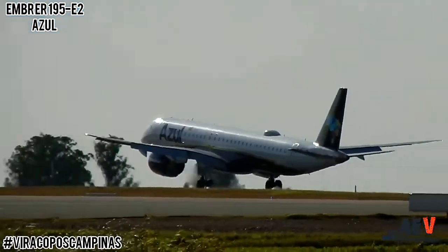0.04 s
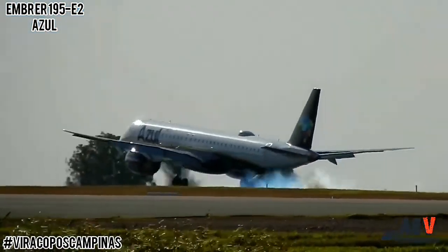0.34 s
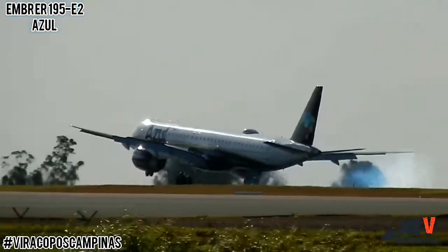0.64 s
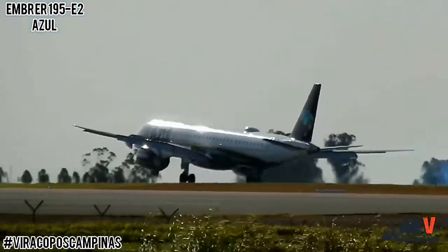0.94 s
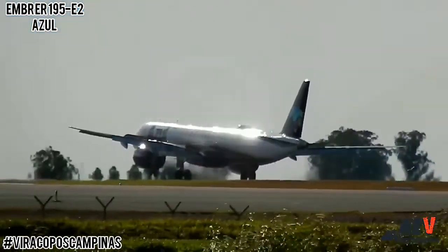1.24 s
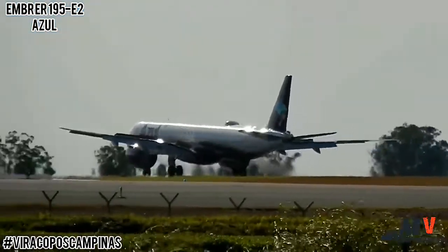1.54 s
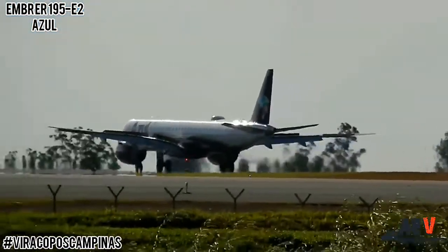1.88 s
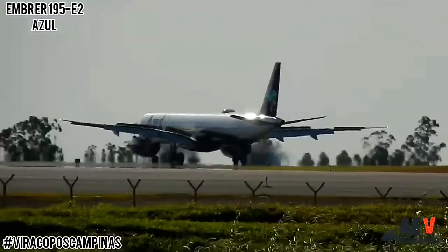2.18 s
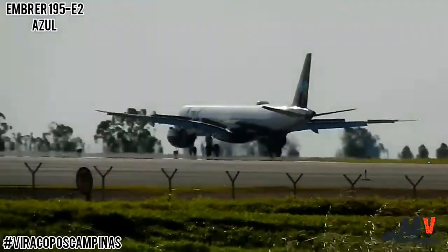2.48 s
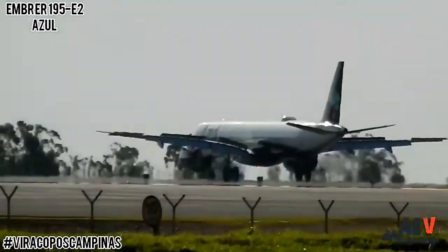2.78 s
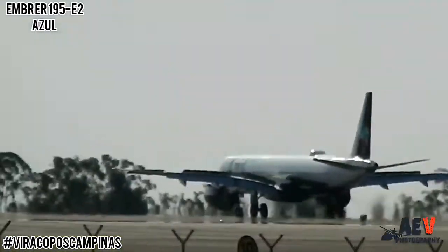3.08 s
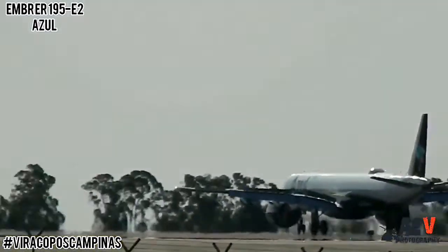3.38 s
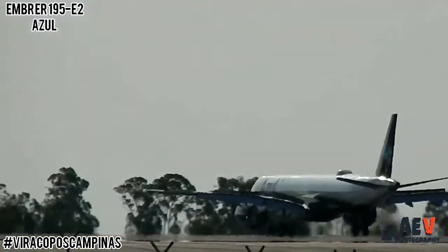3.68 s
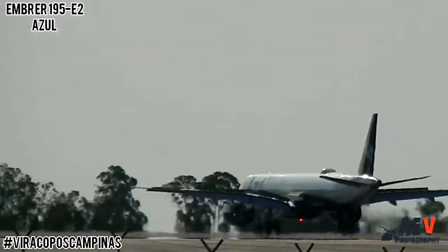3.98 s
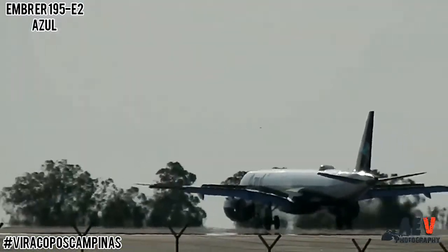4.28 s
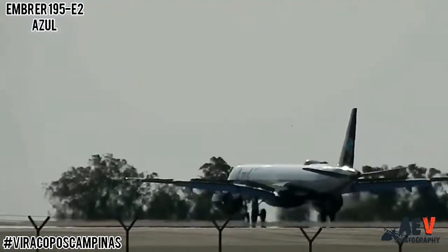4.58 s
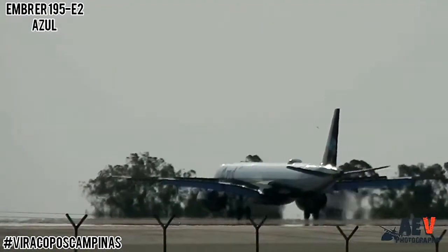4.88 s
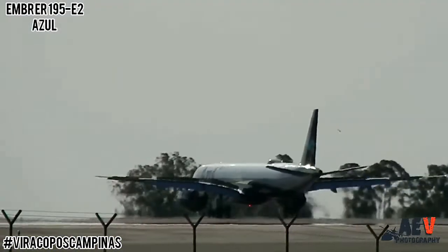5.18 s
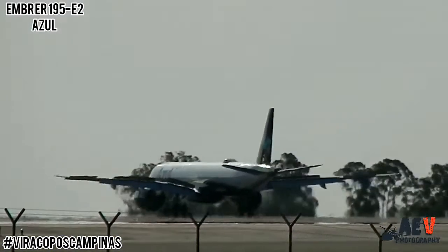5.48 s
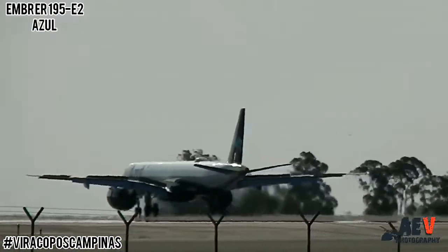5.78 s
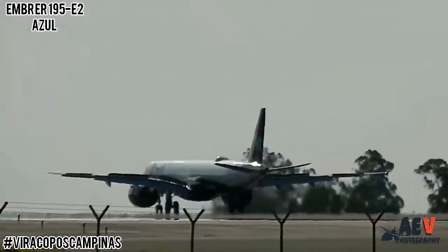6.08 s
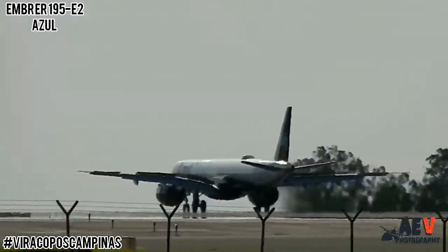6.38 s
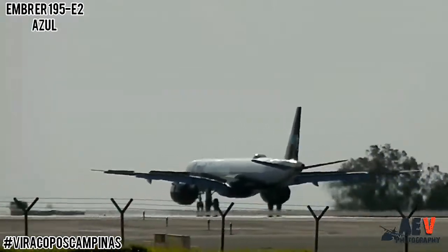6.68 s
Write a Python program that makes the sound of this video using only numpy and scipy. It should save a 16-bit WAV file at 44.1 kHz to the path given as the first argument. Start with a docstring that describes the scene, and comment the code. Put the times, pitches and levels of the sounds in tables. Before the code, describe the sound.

Gusty wind thumps on the microphone while a strap flaps in a fast, crackling rattle and a faraway airliner rumbles along a runway.

```python
"""A loose strap flutters close by in bouts of rapid snaps that harden as the wind pulls it taut.
Each whip of its free end rings, crackles and sizzles, and the strap scrapes as it drags.
Gusts buffet both microphone ports (the left and right openings) here at the airfield fence.
Behind them the jet roar of an airliner rolling far down a runway swells and fades,
and dry grass hisses and ticks."""
import sys
import numpy as np
from scipy import signal
from scipy.fft import rfft, irfft, next_fast_len
from scipy.io import wavfile
from scipy.ndimage import uniform_filter1d, map_coordinates

SR = 44100
rng = np.random.default_rng(int(sys.argv[2]) if len(sys.argv) > 2 else 0)


def wav_out(sig):
    """Save sig, one row per channel (or a flat mono array), as 16-bit PCM at SR to the path in sys.argv[1]."""
    wavfile.write(sys.argv[1], SR, np.round(np.clip(np.atleast_2d(sig).T, -1, 1) * 32767).astype(np.int16))


N = 301379
TIME = np.arange(N) / SR

# Levels in the tables are relative: each source adds its own gain.
# How fast the strap whips, one list for each bout: time_s, snap_rate_hz
FLUTTER_BOUTS = [
    [(.334, 41.4), (.55, 41.5), (.78, 42.5), (.788, 42.5)],
    [(1.165, 35.0), (1.46, 35.5), (1.75, 36.0), (2.04, 36.6), (2.34, 37.4), (2.63, 37.9), (2.92, 38.6),
     (3.21, 39.4), (3.51, 40.4), (3.8, 41.1), (4.09, 41.8), (4.38, 42.5), (4.68, 42.8)],
    [(5.089, 36.6), (5.226, 36.4), (5.5, 37.0), (5.97, 37.6)],
    [(6.117, 37.0), (6.3, 37.0)],
]
# The strap pulls taut and holds until it slips. Slack fades over pull_s, leaving the last four values:
# start_s, pull_s, slack_db, snap_db, crackle_db, sizzle_db, ring_tilt_db_per_octave
PULLS = [(.32, 0.45, 14.5, -18, -38, -53, 13.5), (1.15, 0.29, 6.5, -14, -41.5, -50, 2.5),
         (1.55, 0.31, -7, -21, -41, -46.5, -3), (1.99, 1.0, 4.5, -17, -35.5, -50, -2.5),
         (3.08, 0.11, 2.5, -22, -41, -50, -4.5), (3.35, 0.2, 9, -20.5, -39, -44, 1),
         (3.8, 0.36, 10, -15.5, -35.5, -39, 0.5), (4.2, 0.15, 2, -13, -38, -42.5, -.5),
         (5.08, 0.32, 9, -15.5, -54.5, -40, 5), (5.51, 0.11, 2, -18, -61, -45, -5),
         (5.78, 0.16, 4, -29, -61, -51.5, 2), (6.1, 0.051, -8, -33, -56, -62, -3)]
# Single whips that stand out: time_s, extra_snap_db, extra_crackle_db, extra_sizzle_db
ACCENTS = [(.719, 1.5, -4, -1), (.743, 3, -5, 5), (.767, 3, 0, 5), (1.165, 4, -5, -4), (1.193, 5.5, -5, -2),
           (1.222, -2.5, -1, -4), (1.249, 3, -2, -2), (1.307, 1.5, -4, 0), (1.335, 6, 2, 0),
           (1.364, 5.5, 8, 8), (1.392, 6, 6, 6), (1.42, -3.5, 0, -2), (1.449, -1, 12, 19),
           (1.477, 3.5, 7, 8), (1.505, 3.5, 6, 15), (1.533, 5.5, 9, 12), (1.955, 5.5, -6, -5),
           (2.224, -2, 10, 14), (2.302, -1, 6.5, 4), (2.355, 0, 7.5, -3), (2.675, -1, 5, 4),
           (2.961, 0, 7.5, 4), (3.012, 0.5, 6.5, 8), (3.04, 1, 1, -2), (3.216, 4, -1, 8),
           (3.54, -5, 1, 6.5), (3.665, 1, 5.5, 5), (3.715, 3.5, -2, 0), (3.74, 5, -5, 2),
           (3.765, 5.5, 8, 2), (3.98, 4.5, 9, 10), (4.08, 4.5, -10, 4), (4.149, 3, 0, -4),
           (4.22, 0.5, 2, -2), (4.291, -1, -8, -7), (4.315, 2.5, 0, -6), (4.41, 2.5, 6, 5),
           (4.48, 1, 8, 10), (4.527, 2.5, 0, 1), (4.573, 6.5, -5, 12), (4.62, 2.5, 0, 1),
           (4.645, -9, -12, -7), (5.365, 2, 23.5, 3), (5.85, -3, -4, 6)]
# The tones that ring after a snap: pitch_hz, level_db, time_to_fade_60_db_s
STRAP_TONES = [(246, -7.5, 0.056), (493, -9.5, 0.099), (773, -5, 0.057), (1315, -21, 0.036),
               (1516, -27, 0.21), (2043, -24, 0.057), (2240, -16, .04), (2720, -15.5, 0.031),
               (2880, -22.5, 0.035), (3030, -26, 0.034)]
# The pitch of the strap's edge sinks as it loosens: time_s, pitch_ratio
EDGE_TUNING = [(.8, 1.08), (1.15, 1.025), (3.5, 1.0), (4.6, 1.005), (5.3, .985)]
# How much later the strap is heard on the left: time_s, lag_s
PORT_LAG = [(.5, 0.000053), (2, 0.00014), (4.5, 0.00016)]
# The strap drags over its support: time_s, level_db, half_length_s
SCRAPES = [(.84, -40, 0.065), (1.1, -40, 0.04), (1.35, -28.5, 0.049), (1.54, -35, 0.051), (2.47, -35, 0.1),
           (2.85, -34.5, 0.047), (3.68, -30.5, 0.069), (4.58, -38, 0.072), (5.45, -40, 0.13),
           (6.22, -49, 0.048)]
# Bright rasps among the snaps: time_s, level_db, half_length_s
RASPS = [(0.743, -50.5, 0.031), (2.035, -54, 0.034), (2.158, -43.5, 0.021), (2.701, -43, 0.01),
         (5.19, -60, 0.048)]
# Big eddies (swirls of air) hit the ports: time_s, level_db, half_length_s, left_minus_right_db
BUFFETS = [(0.011, -15.5, 0.05, 2), (0.19, -19, 0.019, -18.0), (0.352, -17, 0.028, -20),
           (0.488, -13, 0.019, -5.5), (0.89, -15, 0.22, -20), (0.908, -22, 0.022, 18.0),
           (1.413, -15.5, 0.093, -1), (1.991, -17.5, 0.17, -4.5), (2.476, -17, 0.075, 7),
           (2.811, -16.5, 0.052, -10), (2.905, -17, 0.017, 18.0), (2.971, -27, 0.015, -18.0),
           (3.085, -34, 0.014, 18.0), (3.303, -14.5, 0.025, -7.5), (3.617, -18.5, 0.037, -6),
           (3.763, -12.5, 0.016, -14.0), (3.976, -19, 0.018, -16), (4.097, -17.5, 0.022, -12),
           (4.295, -20, 0.052, -18.0), (4.434, -19.5, 0.1, 18.0), (4.645, -17.5, 0.038, -6),
           (5.14, -13, 0.14, 8), (5.728, -15, 0.097, -1), (5.957, -11.5, 0.012, -10.0),
           (6.106, -17, 0.024, -18.0), (6.209, -19.5, 0.11, -11), (6.363, -20, 0.015, 18.0),
           (6.488, -23, 0.057, -13), (6.595, -13, 0.015, -18.0), (6.813, -13.5, 0.02, -7)]
# Gusts of smaller eddies: time_s, level_db, half_length_s, left_minus_right_db, swish_db
GUSTS = [(0.027, -20.5, 0.038, 17, -28), (0.153, -17.0, 0.035, 29, -22.0), (0.5, -14.5, 0.011, -1, -27.0),
         (0.636, -20, 0.016, 3, -45), (0.722, -16, 0.011, -1, -39), (0.908, -18, 0.015, 18.0, -28),
         (0.968, -22.5, 0.024, 1, -37), (1.055, -21, 0.014, -2, -36), (1.366, -18.5, 0.03, 14, -25.5),
         (1.562, -17, 0.013, 20, -20.5), (1.587, -20.5, 0.131, 15, -42.0), (1.79, -22.5, 0.025, 26, -22),
         (1.857, -25, 0.02, -18.0, -42.0), (1.972, -17, 0.024, 4.0, -31), (1.98, -21.5, 0.093, 18.0, -27.5),
         (2.181, -17, 0.032, 8.0, -42.0), (2.33, -19, 0.014, 16.0, -34), (2.528, -21.5, 0.076, 16, -25),
         (2.723, -16.5, 0.015, 18.0, -40), (2.825, -23, 0.016, 18.0, -38), (2.9, -17.5, 0.014, 18.0, -42.0),
         (3.068, -20, 0.023, 18.0, -45), (3.324, -16.5, 0.024, 10, -21.5), (3.438, -21, 0.02, 18.0, -21),
         (3.477, -25.5, 0.018, -18.0, -40), (3.551, -14, 0.036, 22, -25.5),
         (3.67, -23, 0.018, -18.0, -42.0), (3.695, -16.5, 0.042, 16.0, -21), (3.824, -21, 0.019, 20, -42.0),
         (3.99, -22.0, 0.014, -7, -45), (4.051, -20.5, 0.033, 6, -42.0), (4.245, -21.5, 0.016, 9, -33),
         (4.673, -23.0, 0.29, 21, -38), (4.698, -26, 0.017, -18.0, -28), (4.749, -14, 0.013, 9, -38),
         (4.932, -18.5, 0.022, 17, -39.5), (5.147, -34, 0.061, 3, -24.5), (5.34, -18, 0.016, 18.0, -42.0),
         (5.578, -20.5, 0.059, 5, -34), (5.748, -22.5, 0.013, -18.0, -44), (5.772, -19, 0.015, 10, -44),
         (5.91, -29, 0.044, -18.0, -40), (6.128, -17.5, 0.0089, 18.0, -42.0), (6.261, -23, 0.021, 16, -23),
         (6.38, -31, 0.014, 18.0, -27), (6.457, -16.0, 0.014, -4.5, -23.5), (6.57, -16.5, 0.056, 19, -23.0),
         (6.74, -22.5, 0.124, -24, -28)]
# The breeze drops for a moment: time_s, depth_db, half_length_s
LULLS = [(0.4, 4, 0.035), (2.99, 3, 0.025), (3.177, 2.5, 0.11), (4.8, 12, 0.016), (5.843, 8, 0.029),
         (6.023, 5.5, 0.049)]
# How loud the jet is: time_s, level_db
JET_LEVEL = [(0, -35.5), (.75, -30), (1.0, -30), (2, -37), (4, -35), (4.85, -29.5), (5.55, -22), (5.9, -27),
             (6.02, -32.5), (6.22, -27.5), (6.45, -42), (6.83, -35.5)]
# How loud the grass is: time_s, level_db
GRASS_LEVEL = [(0.0, -57), (0.26, -61), (0.36, -53), (0.54, -50.5), (1.07, -56), (1.53, -50.5), (1.73, -55),
               (2.3, -59), (2.75, -52.5), (3.33, -56.5), (3.9, -56.5), (4.3, -59), (4.6, -52), (4.82, -60),
               (5.59, -51), (5.93, -56.5), (6.01, -61.5), (6.18, -56), (6.33, -62), (6.76, -76)]
# Small dry ticks: start_s, level_db, left_minus_right_db, decay_s
TICKS = [(.821, -40.5, 1, .0005), (4.931, -38, 14, 0.00047), (5.173, -38, 2, 0.00056),
         (5.321, -38, -1, 0.00046), (6.550, -47, -17, .0006), (6.611, -47, -9, 0.00091),
         (6.670, -44.5, 23, 0.0012), (6.791, -41.5, -12, 0.00066)]

# A colour says how strong a sound is from bass to treble. Each one lists: pitch_hz, level_db
SNAP_COLOUR = [(150, -2), (400, -1.5), (800, 4), (1400, 5.5), (2100, 1), (2480, -12), (3300, -8),
               (4200, -22.5), (5100, -37), (6200, -77), (14000, -58)]
CRACKLE_COLOUR = [(1500, 10), (3000, 11), (4200, 8), (5300, 11), (6500, 2), (9000, 5.5), (11000, 6),
                  (13000, -3.5), (15500, -29)]
SIZZLE_COLOUR = [(2300, -23), (2500, -15), (2700, 13), (2900, -2), (3200, -10), (3700, -9), (4600, -14),
                 (5020, 6), (5300, -4.5), (5700, -22), (6800, -31)]
SCRAPE_COLOUR = [(300, -8), (800, 6), (1150, -7), (1450, 3.5), (1800, -7), (2100, -1), (2470, -18),
                 (2750, -4), (3200, -19), (4200, -16), (5100, -16), (6200, -31.5), (11000, -34),
                 (15000, -41)]
BUFFET_COLOUR = [(12, -13), (25, -14), (40, -6), (65, -0.5), (120, 0.5), (170, -5.5), (240, -12),
                 (400, -41), (900, -81.5)]
GUST_COLOUR = [(90, -29), (160, 0), (230, -0.5), (330, -4), (500, -11.5), (750, -22.5), (1200, -45),
               (2000, -41), (3500, -64), (7000, -73), (15000, -95)]
SWISH_COLOUR = [(200, -10), (380, 7), (550, 4.5), (850, -2.5), (1400, -14), (2500, -35.5), (4500, -47),
                (9000, -79), (15000, -64)]
JET_COLOUR = [(60, 12.5), (300, 0.5), (550, 5.5), (700, 5), (950, 10.5), (1400, -1), (2000, -8),
              (2600, -22.5), (4000, -31), (7000, -54), (15000, -61)]
GRASS_COLOUR = [(800, 2), (2000, 18.5), (3200, 15), (4500, 8.5), (6500, 6), (9000, 5), (11000, 5),
                (13000, 0), (15500, -40)]
TICK_COLOUR = [(800, 5), (2500, 10), (4500, -0.5), (6500, -2.5), (11000, -5.5), (15000, -15)]
SCUFF_COLOUR = [(2500, -37), (3800, -3), (4500, 5), (5600, -7), (7000, -12), (14000, -26)]


def strap(snap_gain_db, sizzle_gain_db):
    """Each whip makes a dip in air pressure that snaps, rings and rustles, while the edge crackles."""
    snap_db, crackle_db, sizzle_db, tilt_db = tension()
    extra_snap_db, extra_crackle_db, extra_sizzle_db = accents()
    pulses = whips(scatter_db=1.1, jitter_s=.00004)
    blows = -pulses * undb(snap_db + extra_snap_db + snap_gain_db)
    snaps = snap(blows + rattle(blows, rate_hz=400, gain_db=-20))
    rings = ringing(blows, tilt_db, gain_db=-5)
    rustle = bursts(np.abs(blows), rise_s=.00092, decay_s=.0098) * noise(SNAP_COLOUR) * undb(-30)
    crackles = crackle(pulses * undb(crackle_db + extra_crackle_db))
    sizzles = sizzle(pulses * undb(sizzle_db + extra_sizzle_db + sizzle_gain_db))
    return (at_ports(snaps + rings) + rustle + crackles + sizzles) * pan(.66)


def tension(stall_s=.03, stall_db=18):
    """A slack strap is quieter and duller than a taut one; it goes slack as each bout ends."""
    pulls = np.array(PULLS)
    current = np.maximum(np.searchsorted(pulls[:, 0], TIME) - 1, 0)
    start_s, pull_s, slack_db, snap_db, crackle_db, sizzle_db, tilt_db = pulls[current].T
    slack = slack_db * np.clip(1 - (TIME - start_s) / pull_s, 0, 1)
    for bout in FLUTTER_BOUTS:
        slack += stall_db * np.clip(1 - np.abs(TIME - bout[-1][0]) / stall_s, 0, 1) ** 2
    return snap_db - slack, crackle_db - .94 * slack, sizzle_db - slack, tilt_db - .85 * slack


def accents(reach_s=.012):
    """Some whips snap, crackle or sizzle harder or softer than their neighbours."""
    extra_db = np.zeros((3, N))
    for time_s, snap_db, crackle_db, sizzle_db in ACCENTS:
        extra_db[:, np.abs(TIME - time_s) < reach_s] = [[snap_db], [crackle_db], [sizzle_db]]
    return extra_db


def whips(scatter_db, jitter_s):
    """One pulse for each whip of the strap's free end, slightly uneven in strength and time."""
    starts = []
    for bout in FLUTTER_BOUTS:
        blowing = (TIME >= bout[0][0]) & (TIME < bout[-1][0])
        whip_count = np.ceil(np.cumsum(curve(bout) * blowing) / SR)
        starts.extend(np.flatnonzero(np.diff(whip_count, prepend=0)))
    late, strength = rng.standard_normal((len(starts), 2)).T
    pulses = np.zeros(N)
    pulses[(starts + late * jitter_s * SR).astype(int)] = undb(scatter_db * strength)
    return pulses


def snap(blows, split_hz=1500, echo_s=.001383, echo_share=.37):
    """The strap lies differently for each snap, dull or bright; a hard surface beside it echoes."""
    plain = tint(blows, SNAP_COLOUR)[0]
    lows = signal.sosfilt(signal.butter(1, split_hz, fs=SR, output="sos"), plain)
    bright_db = .8 * wander(40)[0]
    varied = lows * undb(-bright_db) + (plain - lows) * undb(bright_db)
    share = np.clip(echo_share + .06 * wander(30)[0], 0, .8)
    return sum(share ** bounce * delay(varied, bounce * echo_s) for bounce in range(3))


def rattle(blows, rate_hz, gain_db):
    """The loose end chatters in weak, irregular taps around each whip."""
    taps = (rng.random(N) < rate_hz / SR) * rng.standard_normal(N)
    return taps * undb(gain_db) * bursts(np.abs(blows), rise_s=.0046, decay_s=.016)


def ringing(blows, tilt_db, gain_db, uneven_db=1.8, detune=.007, edge_from_hz=1800, size=3000):
    """Each whip sets off fading tones, tuned and balanced a little differently as the strap shifts."""
    pitch_hz, level_db, fade_s = np.transpose(STRAP_TONES)
    age_s = np.arange(size) / SR
    decays = np.exp(-np.log(1000) * age_s / fade_s[:, None])
    decays /= np.sqrt(np.sum(decays ** 2, axis=1, keepdims=True) / 2)  # same energy for every tone
    rings, edge_ratio = np.zeros(N + size), curve(EDGE_TUNING)
    for i in np.flatnonzero(blows):
        tuning, balance = rng.standard_normal((2, len(pitch_hz)))
        weights = undb(level_db + tilt_db[i] * np.log2(pitch_hz / 1400) + uneven_db * balance)
        tuned_hz = pitch_hz * np.where(pitch_hz > edge_from_hz, edge_ratio[i], 1) * (1 + detune * tuning)
        waves = np.sin(2 * np.pi * np.outer(tuned_hz, age_s))
        rings[i:i + size] += blows[i] * weights @ (decays * waves)
    return rings[:N] * undb(gain_db)


def crackle(pulses, tip_db=19, edge_db=-5, uneven_db=1.5, grain_db=3):
    """The strap's tip gives one sharp click in each whip, and its edge crackles around it."""
    flicks = pulses * undb(uneven_db * wander(30)[0])
    click = tint(flicks, CRACKLE_COLOUR)[0] * undb(tip_db)
    envelope = bursts(flicks, rise_s=.0017, decay_s=.0047) * undb(edge_db + grain_db * wander(2500))
    hiss = noise(CRACKLE_COLOUR, channels=1) + .62 * noise(CRACKLE_COLOUR)
    return at_ports(click) + envelope * hiss


def sizzle(pulses, uneven_db=1.5):
    """The edge sizzles at each whip, and its pitch sinks as it loosens."""
    envelope = bursts(pulses * undb(uneven_db * wander(15)[0]), rise_s=.00054, decay_s=.0074)
    position = np.cumsum(curve(EDGE_TUNING))  # reading the noise more slowly lowers its pitch
    hiss = [map_coordinates(side, [position], mode="mirror") for side in noise(SIZZLE_COLOUR)]
    return envelope * np.array(hiss)


def scrapes(gain_db, catch_db):
    """The dragging strap catches and slips in fine grains that make it ring."""
    drag = humps(SCRAPES)
    grains = rng.standard_normal((3, N)) * undb(catch_db * wander(500))
    shared, *each_port = normalise(tint(grains * drag, SCRAPE_COLOUR)) * np.sqrt(np.mean(drag ** 2))
    return (at_ports(shared) + np.array(each_port)) * undb(gain_db)


def rasps(gain_db):
    """Short spurts of gritty hiss among the snaps."""
    return noise(CRACKLE_COLOUR) * humps(RASPS) * undb(gain_db + 1.3 * wander(700))


def wind(windward_db=7):
    """Big eddies thump, small ones rumble and the finest swish; the last two favour the left port."""
    gusts = [row[:4] for row in GUSTS]
    swishes = [(time_s, swish_db, half_s, left_db) for time_s, _, half_s, left_db, swish_db in GUSTS]
    big = wind_strength(BUFFETS, breeze_db=-20, breeze_left_db=-.4)
    small = wind_strength(gusts, breeze_db=-25, breeze_left_db=windward_db, wander_db=.6)
    fine = wind_strength(swishes, breeze_db=-54, breeze_left_db=windward_db, wander_db=2.8, wander_hz=13)
    return (eddies(big, BUFFET_COLOUR, gain_db=5, flicker_hz=25.88, flicker_db=.75)
            + eddies(small, GUST_COLOUR, gain_db=5, flicker_hz=59.9, flicker_db=1.62)
            + eddies(fine, SWISH_COLOUR, gain_db=4, flicker_hz=90.2, flicker_db=1.84))


def wind_strength(gusts, breeze_db, breeze_left_db, wander_db=0, wander_hz=10):
    """How hard it blows at each port: a breeze with lulls, and gusts that swell and pass on top."""
    lull_db = sum(depth_db * hump(time_s, half_s) for time_s, depth_db, half_s in LULLS)
    drift_db = wander_db * wander(wander_hz, channels=2)
    power = (undb(breeze_db - lull_db + drift_db) * pan(breeze_left_db)) ** 2
    for time_s, level_db, half_s, left_db in gusts:
        power += (undb(level_db) * pan(left_db)) ** 2 * hump(time_s, half_s)
    return np.sqrt(power)


def eddies(strength, colour, gain_db, flicker_hz, flicker_db):
    """Swirling air strikes each port on its own, in quick uneven puffs."""
    puffs = normalise(noise(colour) * undb(flicker_db * wander(flicker_hz, channels=2)))
    return puffs * undb(gain_db) * strength


def jet(gain_db, waver_db):
    """The far exhaust roar reaches both ports nearly alike and wavers in the moving air."""
    roar = noise(JET_COLOUR, channels=1) + .14 * noise(JET_COLOUR)
    roar[0] = delay(roar[0], lag_s=.0001)  # the aircraft is off to the right
    return normalise(roar) * undb(curve(JET_LEVEL) + gain_db + waver_db * wander(20)) * pan(.72)


def grass(gain_db, flicker_db):
    """Dry stalks rub in the wind: a fine, flickering hiss."""
    return noise(GRASS_COLOUR) * undb(curve(GRASS_LEVEL) + gain_db + flicker_db * wander(120))


def ticks(gain_db):
    """Dry ticks close by: tiny bursts of noise that start at once and die fast."""
    envelope = np.zeros((2, N))
    for start_s, level_db, left_db, decay_s in TICKS:
        start = int(start_s * SR)
        fade = np.exp(-np.minimum(TIME[:N - start] / decay_s, 20))
        envelope[:, start:] += pan(left_db) * undb(level_db + gain_db) * fade
    return tint(envelope * rng.standard_normal(N), TICK_COLOUR)


def scuff(time_s, level_db, half_s, left_db):
    """One short, bright scuff of noise."""
    return noise(SCUFF_COLOUR) * undb(level_db) * hump(time_s, half_s) * pan(left_db)


def undb(db):
    """Turn decibels into a number to multiply by."""
    return 10 ** (np.asarray(db) / 20)


def curve(table):
    """Join (time_s, value) points with straight lines."""
    return np.interp(TIME, *np.transpose(table))


def normalise(x):
    """Scale to an average power of 1."""
    return x / np.sqrt(np.mean(x ** 2))


def colour_gains(colour, size):
    """The gain a colour gives each frequency in a spectrum."""
    pitch_hz, level_db = np.transpose(colour)
    bin_hz = np.arange(size // 2 + 1) * SR / size
    return undb(np.interp(np.log(bin_hz + 1), np.log(pitch_hz), level_db))


def noise(colour, channels=2):
    """A separate noise of this colour for each channel."""
    size = next_fast_len(N, True)
    spectrum = rfft(rng.standard_normal((channels, size))) * colour_gains(colour, size)
    return normalise(irfft(spectrum, size)[:, :N])


def tint(x, colour, size=2048):
    """Filter x so that each pulse leaves a short ring of this colour."""
    cepstrum = irfft(np.log(colour_gains(colour, size)))
    cepstrum[1:size // 2] *= 2  # folding onto the first half puts the ring after the pulse
    cepstrum[size // 2 + 1:] = 0
    response = irfft(np.exp(rfft(cepstrum)))
    return signal.oaconvolve(np.atleast_2d(x), response[None] / np.linalg.norm(response), axes=1)[:, :N]


def wander(rate_hz, channels=1):
    """Drift from one random value to the next, rate_hz times a second."""
    step = max(int(SR / rate_hz), 1)
    stairs = np.repeat(rng.standard_normal((channels, N // step + 2)), step, axis=1)
    return 2.11 * uniform_filter1d(stairs, step)[:, :N]


def delay(x, lag_s):
    """Make x later by a steady or moving lag."""
    return np.interp(TIME - lag_s, TIME, x, left=0)


def at_ports(x):
    """The strap's sound reaches the left port just after the right."""
    return np.array([delay(x, curve(PORT_LAG)), x])


def pan(left_db):
    """Left and right gains, left_db apart, that keep the total power the same."""
    pair = undb(np.reshape([left_db, -left_db], (2, 1)) / 2)
    return normalise(pair)


def bursts(pulses, rise_s, decay_s, size=2048):
    """An envelope (a loudness outline) that swells into each pulse and dies after it."""
    age_s = np.arange(-size, size + 1) / SR
    return signal.oaconvolve(pulses, np.exp(np.minimum(age_s / rise_s, -age_s / decay_s)), mode="same")


def hump(time_s, half_s):
    """A bell-shaped swell that peaks at time_s."""
    return np.exp(-.5 * ((TIME - time_s) / half_s) ** 2)


def humps(rows):
    """One swell for each row, added up."""
    return sum(undb(level_db) * hump(time_s, half_s) for time_s, level_db, half_s in rows)


def scene():
    """The strap and the wind in front, the jet and the grass behind."""
    flutter = strap(snap_gain_db=20, sizzle_gain_db=5.5)
    small_sounds = ticks(gain_db=15) + rasps(gain_db=12.5)
    small_sounds += scuff(time_s=5.703, level_db=-31, half_s=.012, left_db=21)
    front = flutter + scrapes(gain_db=-1, catch_db=.5) + wind()
    return front + jet(gain_db=1, waver_db=.6) + grass(gain_db=10, flicker_db=1.12) + small_sounds


def record(dry):
    """Round off the loudest peaks, fade in quickly and cut the highest treble."""
    fade_s, top_hz = .004, 15300
    rounded = dry / (1 + dry ** 16) ** (1 / 16)
    fade_in = np.minimum(TIME / fade_s, 1)
    return signal.sosfilt(signal.ellip(8, .2, 70, top_hz, fs=SR, output="sos"), rounded * fade_in)


dry = scene()
out = record(dry)
wav_out(out)
```